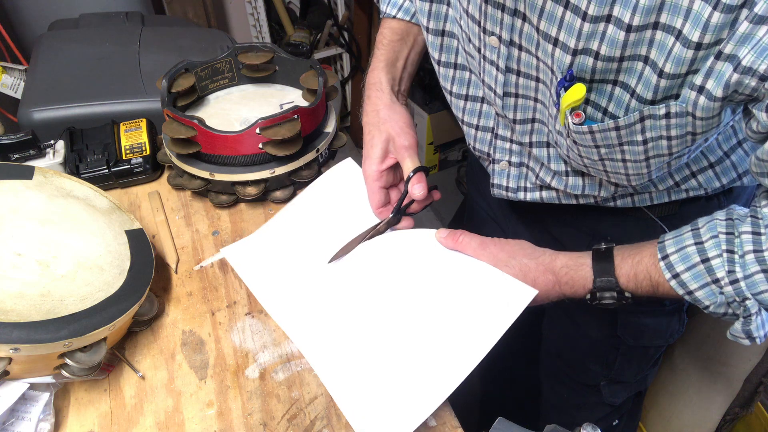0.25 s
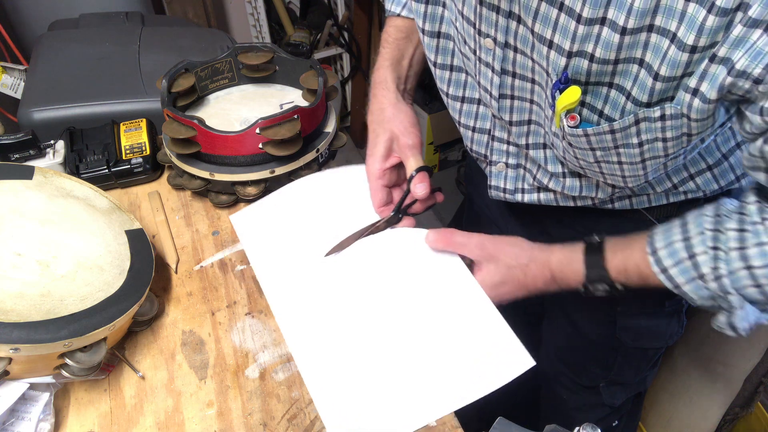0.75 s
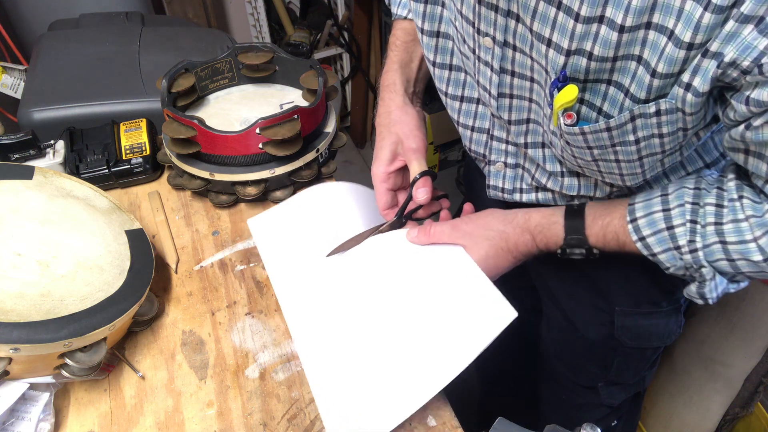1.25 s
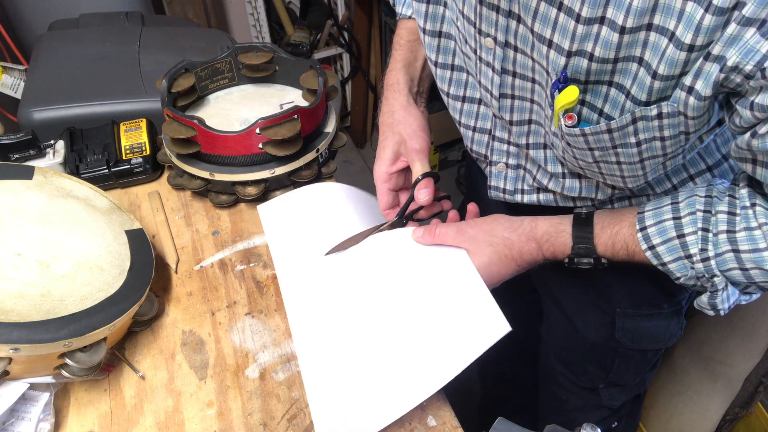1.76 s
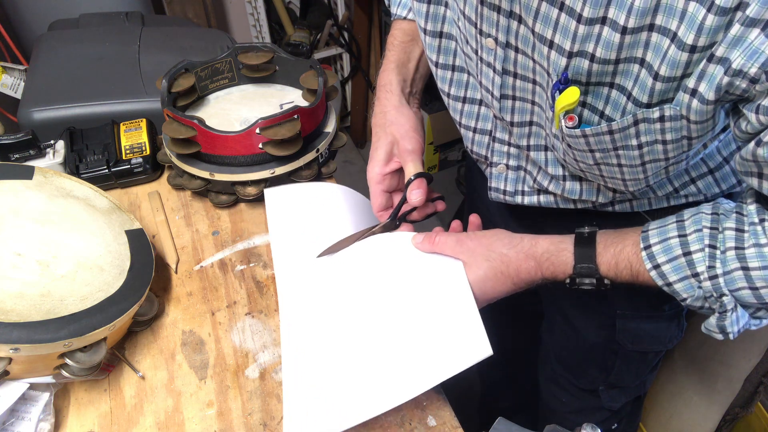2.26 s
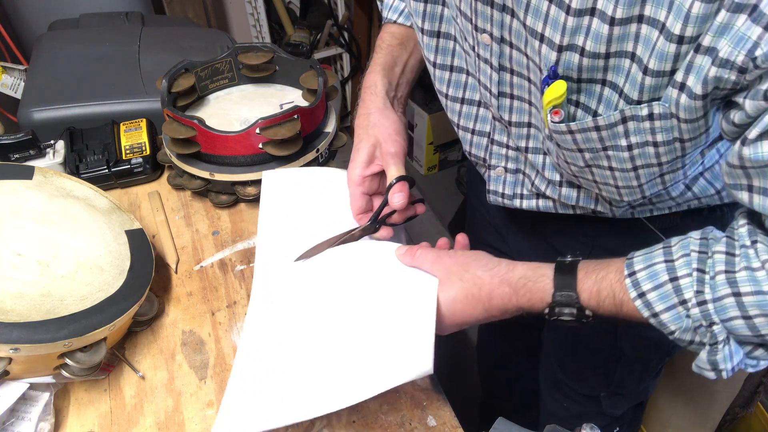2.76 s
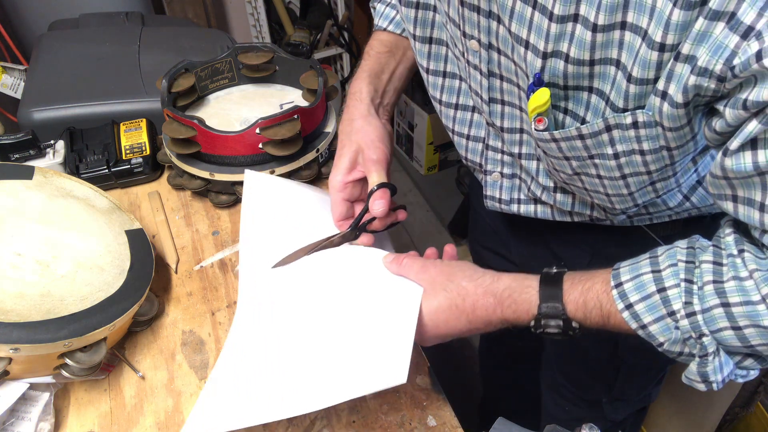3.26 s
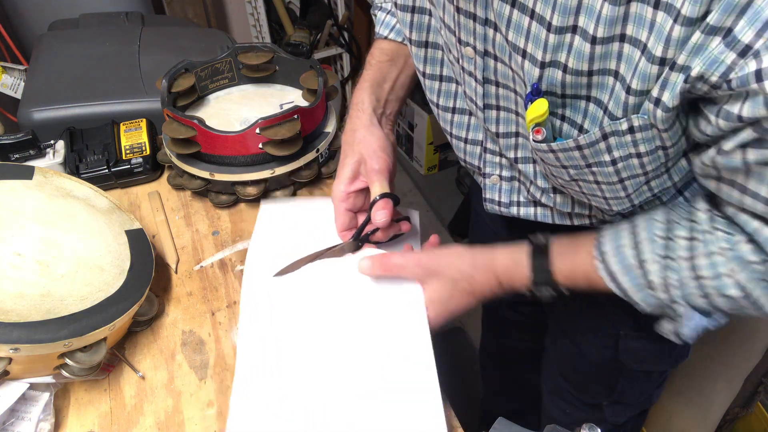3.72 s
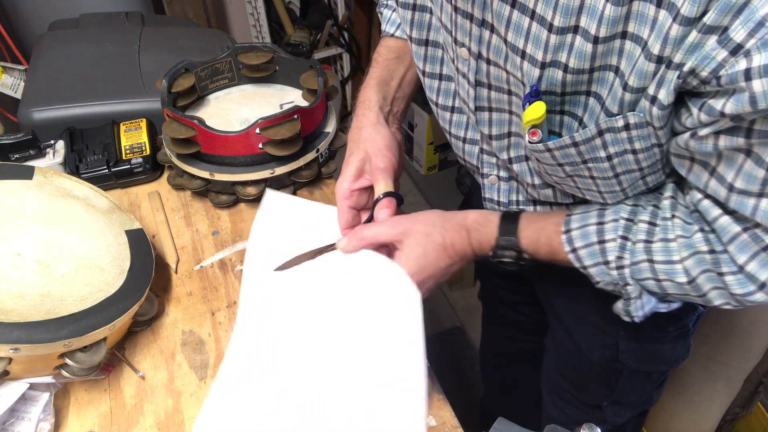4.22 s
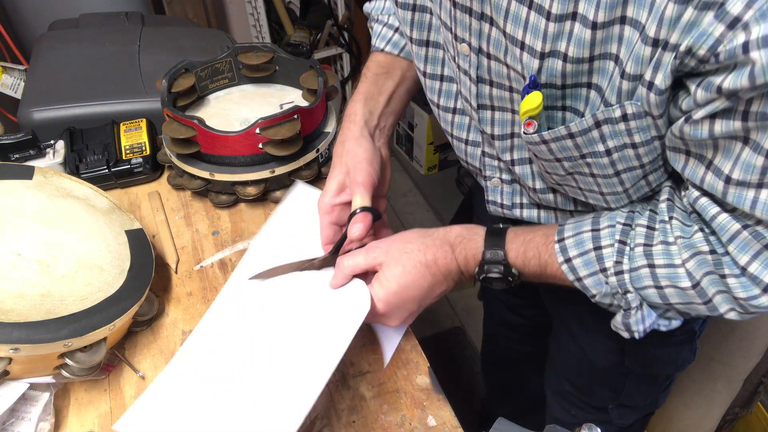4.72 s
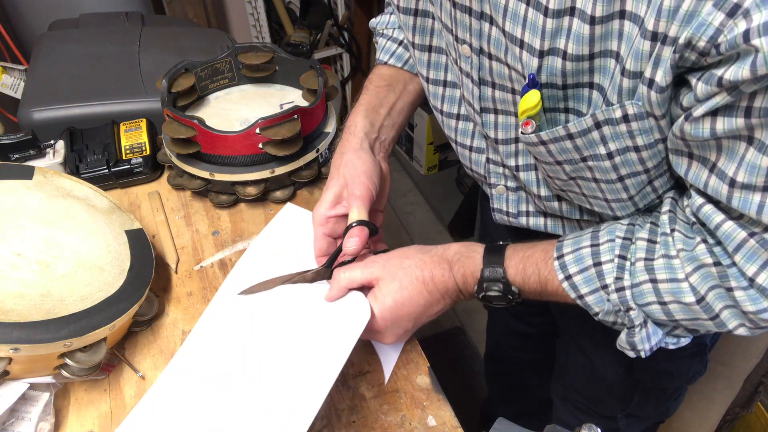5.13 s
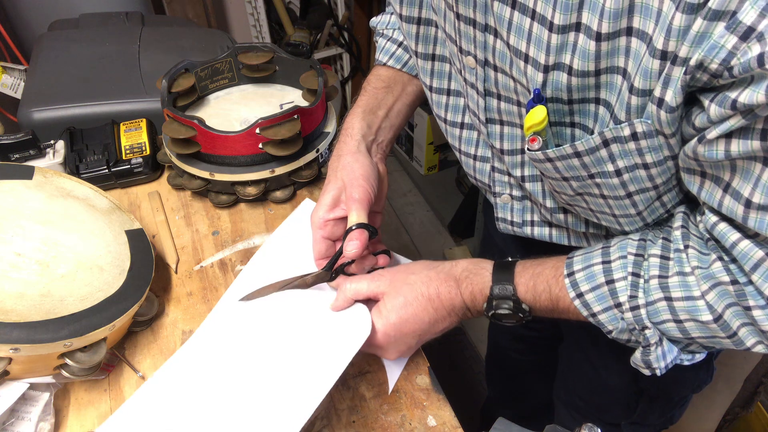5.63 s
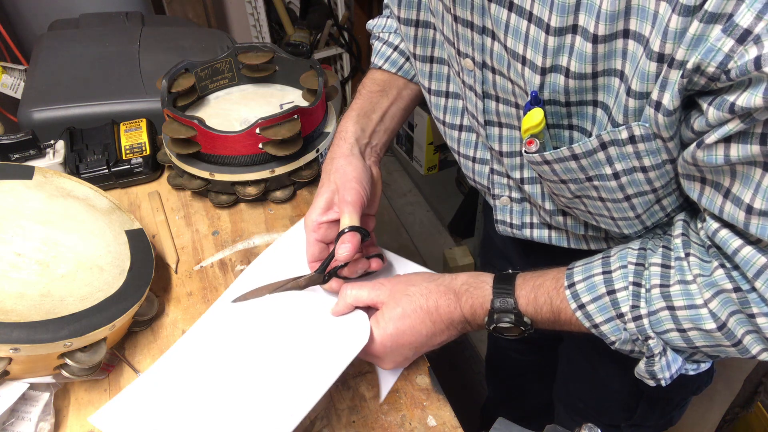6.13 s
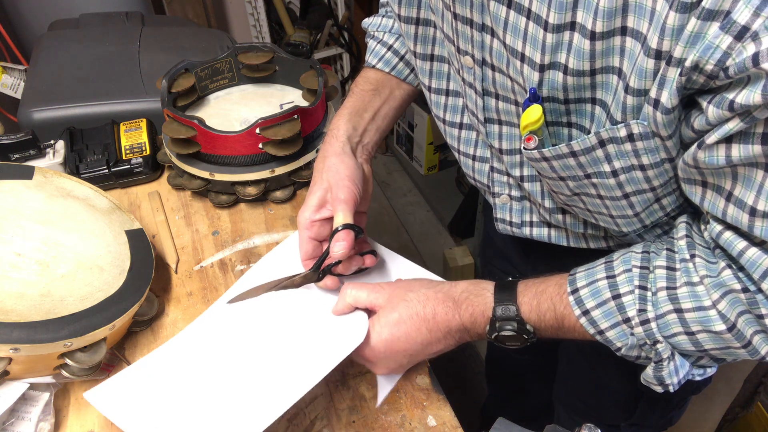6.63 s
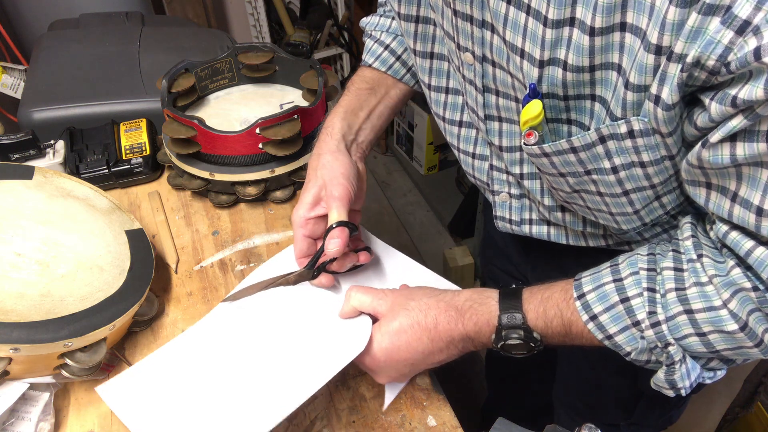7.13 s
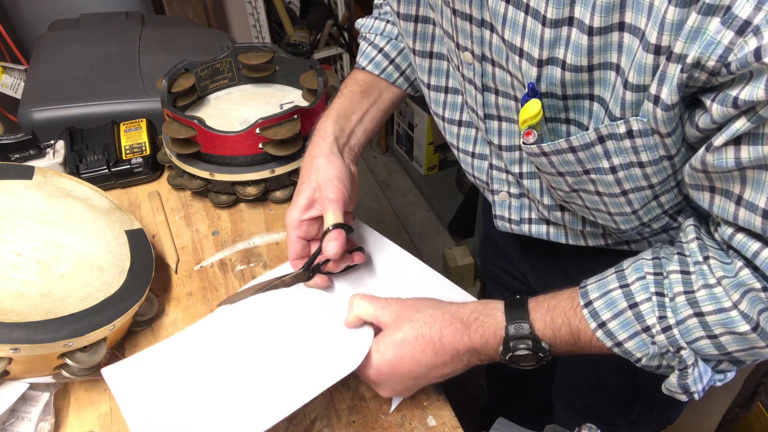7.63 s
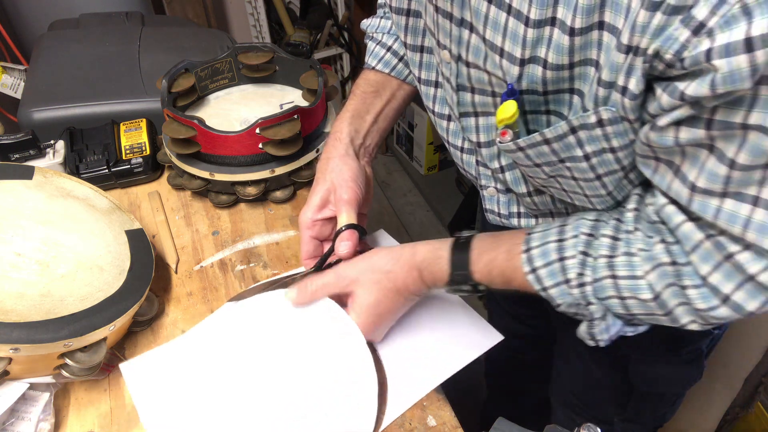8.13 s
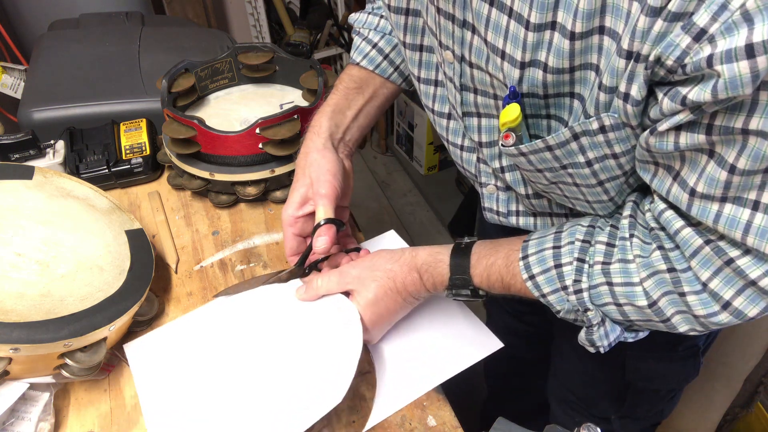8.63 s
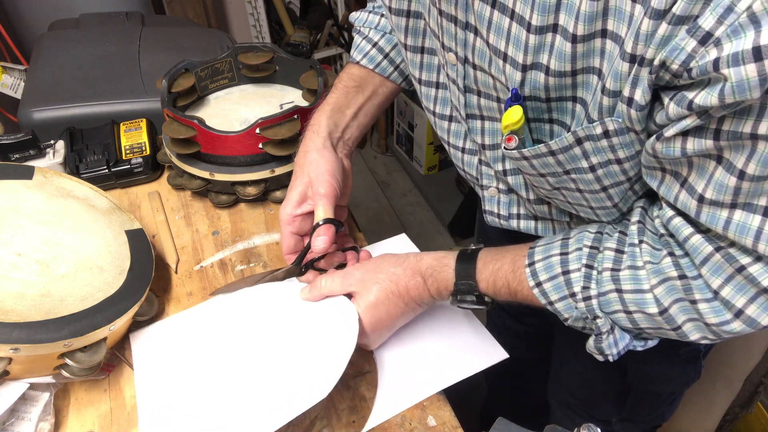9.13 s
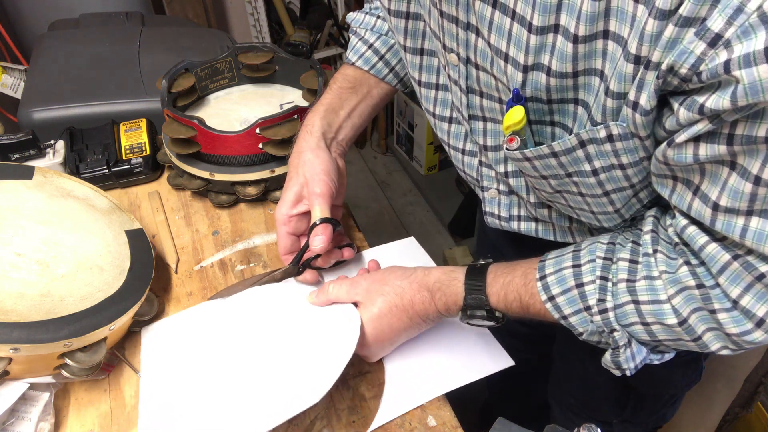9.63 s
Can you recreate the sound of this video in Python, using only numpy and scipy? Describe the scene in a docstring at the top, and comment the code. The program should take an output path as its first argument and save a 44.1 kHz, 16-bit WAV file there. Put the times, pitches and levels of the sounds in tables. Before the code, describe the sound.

Scissors snip through a sheet of paper in quick raspy strokes, pausing as the sheet slides and rustles, over low room noise.

```python
"""Over workshop room noise, scissors snip through a sheet of paper, up to about four strokes a second.
Each stroke shears fibres in a grainy rasp; single fibres snap, the blades stick and slip in short bursts.
The free sheet flutters low, now and then bumps the bench, and hisses as hand and steel slide over it.
Near 4 s a low hum comes in; after a pause of sliding, the blades cut on deep in the sheet.
Around 8 s the sheet slides again and the hum fades out, then five last snips follow."""
import sys
import numpy as np
from scipy import signal
from scipy.fft import rfft, irfft, next_fast_len
from scipy.io import wavfile
from scipy.ndimage import uniform_filter1d, map_coordinates

SR = 44100
rng = np.random.default_rng(int(sys.argv[2]) if len(sys.argv) > 2 else 0)


def generate_wav(sig):
    """Save sig (samples, or channels by samples) to the path in sys.argv[1] as 16-bit PCM at SR."""
    pcm = np.round(np.clip(np.atleast_2d(sig).T, -1, 1) * 32767).astype(np.int16)
    wavfile.write(sys.argv[1], SR, pcm)


N = 435266

# Colours of the layers. Each row: frequency in Hz, relative level per Hz in dB.
ROOM_TONE = [(25, -10), (35, 14), (66, 19), (211, 7), (800, 3), (1620, -7.5), (4360, -19), (5740, -19),
             (10000, -23), (14600, -23), (15900, -40)]
LOOSE_RASP = [(290, -57.5), (620, -52), (742, -8), (957, 1), (1420, 8.5), (2050, 11.5), (2950, 8.5),
              (8000, -31), (12500, -70)]  # cutting at the loose edge
DEEP_RASP = [(240, -70), (400, -15), (636, -3.5), (950, -5), (1370, 5.5), (2170, -11), (4440, -15),
             (6150, -27), (8000, -33), (12500, -80)]  # cutting deep in the sheet
SHEET_RUSTLE = [(290, -69), (500, -25), (728, -7.5), (1300, 3), (2370, 2.5), (3000, 1), (10000, -32),
                (14000, -65)]
SHEET_HISS = [(2350, -52), (4000, 0), (5400, -4), (6240, -1), (8600, -7), (12000, -5.5), (15900, -9.5)]
SHEET_FLUTTER = [(59, -26), (100, -5.5), (378, 5.5), (642, -1.5), (1000, -10.5), (1300, -41), (2200, -120)]
# Resonances. Each row: centre in Hz, width in Hz, lift in dB.
BLADE_RESONANCES = [(1290, 1300, 1), (2700, 960, -2.5), (2850, 64, 5), (4450, 180, 4.5), (5440, 350, 5.5),
                    (6350, 900, -0.5), (7950, 430, 4)]
MICROPHONE_EQ = [(9560, 550, 2.5), (10470, 700, -6)]
# The sheet slides on hand, steel and bench.
# Each row: time in seconds, rustle level in dB, hiss in dB relative to the rustle.
SLIDING = [(0, -69, -12), (.8, -72, -1), (.91, -62.5, -5.5), (1.02, -59, -9), (1.08, -52, -15),
           (1.15, -56.5, -6), (1.165, -51, -9), (1.24, -48.5, -10.5), (1.28, -57.5, -10.5), (1.42, -73, -6),
           (2.05, -67.5, -6), (2.55, -63.5, -12), (3, -58.5, -37), (3.45, -65, -13), (3.75, -58, -9),
           (3.99, -48.5, -16), (4.05, -66.5, -17), (4.27, -63.5, -5.5), (4.29, -57, 6), (4.36, -48.5, -5.5),
           (4.41, -48, -9), (4.62, -56, -10), (5, -67.5, -9.5), (7.8, -73.5, -1.5), (7.92, -50, -15),
           (8, -57, -5), (8.02, -62, -4), (8.225, -57, -6.5), (8.245, -54, 4), (8.295, -52.5, 1.5),
           (8.31, -55, -7.5), (8.42, -49.5, -5), (8.52, -55, -9.5), (8.68, -57, -5), (8.72, -77, 0.5),
           (9.87, -72.5, -8)]
# How far the blades are buried. Each row: time in seconds, depth from 0 (loose edge) to 1.
BLADE_DEPTH = [(0, 0.08), (2, 0.01), (3, 0.56), (3.5, 0.77), (4, 0.09), (4.8, 1), (7.8, 1), (8.2, 0.97),
               (8.7, 0.96), (9.87, 0.72)]
# The room's decay. Each row: frequency in Hz, seconds to fall by 60 dB.
ROOM_DECAY = [(300, 0.4), (2000, 0.094), (10000, 0.15)]
# Blade strokes. Each row: start in seconds, length in seconds, rasp level in dB, rise from middle to end
# in dB, hiss and flutter in dB relative to the rasp, resonance in Hz, its lift in dB, jerkiness 0 to 1.
BLADE_STROKES = [(0.008, 0.09, -46, -1.5, -14, -3.5, 6400, 5, 0.5),
                 (0.168, 0.051, -58, -1, -35, 4, 8960, -9, 0.1),
                 (0.221, 0.14, -50, -6, -9, -11, 2840, 4.5, 0.5),
                 (0.44, 0.059, -43, 1, -9.5, -9.5, 8500, 1, 0.5),
                 (0.56, 0.19, -52.5, -6.5, -12.5, -10.5, 8910, 1, 0.8),
                 (1.421, 0.17, -60, -8, -7.5, -3.5, 2400, 11, 0.4),
                 (1.68, 0.078, -49.5, 2.5, -10.5, -8, 3030, 10.5, 0),
                 (1.853, 0.18, -56, 1.5, -17, -11, 9000, 4, 1),
                 (2.146, 0.074, -44.0, -2.5, -14.5, -17.5, 6000, 9.5, 0),
                 (2.283, 0.15, -54, 3, -18.5, -23, 2700, 0, 1),
                 (2.573, 0.086, -43.5, -5.5, -17, -27, 6440, 8, 0),
                 (2.738, 0.16, -53, -3, -20, -17, 6500, 6, 0.95),
                 (2.952, 0.079, -46, -1, -16.5, -22, 6230, 7, 0),
                 (3.104, 0.24, -51.5, 4, -24, -16, 7000, 4, 0.8),
                 (3.475, 0.073, -49, -5.5, -21, -13, 5860, 9, 0),
                 (3.568, 0.098, -48, -1, -27, -21, 3830, 1, 0.6),
                 (3.785, 0.057, -51, -24, -16, -9, 3600, 9, 0.5),
                 (3.897, 0.087, -40, 5, -17.5, -44, 3050, 5.5, 0.25),
                 (4.699, 0.11, -51, 5.5, -9.5, -12, 5300, -0.5, 0.23),
                 (4.883, 0.11, -59, -1, -9, -27, 1050, 9, 0.94),
                 (5.069, 0.16, -55.5, -1, -17, -35, 4160, 7.5, 0.99),
                 (5.416, 0.076, -43, -5, -11, -20, 2480, 6.5, 0.35),
                 (5.62, 0.12, -50, 0.5, -16, -21, 1290, 5.5, 0.95),
                 (5.922, 0.096, -41.5, -2, -11.5, -23.5, 7840, 5.5, 0.06),
                 (6.168, 0.13, -49.5, -8, -10.5, -22, 1290, 0, 0.89),
                 (6.439, 0.095, -48.5, 0.5, -5, -14, 4590, 8.5, 0.07),
                 (6.664, 0.091, -45.5, -3, -10, -23, 1086, -3, 0.76),
                 (6.909, 0.11, -46, 3.5, -9, -23, 1084, 2, 0.73),
                 (7.096, 0.15, -44.5, 4, -15.5, -25, 8300, 8, 0.92),
                 (7.398, 0.097, -43.5, 6, -11, -24, 8140, 7, 0.5),
                 (7.553, 0.15, -40, 0, -12, -22, 4180, 1, 0.91),
                 (8.751, 0.15, -51, -5, -7.5, -29, 8200, 5.5, 0.4),
                 (9.044, 0.081, -45.5, -0.5, -10.5, -35, 7900, 6.5, 0),
                 (9.223, 0.097, -50.5, -1.5, -9, -18, 5570, 1, 0.95),
                 (9.452, 0.091, -46.5, 0, -11.5, -26.5, 7360, 6.5, 0),
                 (9.666, 0.1, -40, -8.5, -12.5, -28, 5600, 5, 0.66)]
# Cracks in the paper. Each row: time in seconds, strength in dB, treble in dB relative to that strength.
FIBRE_SNAPS = [(0.0179, -36, -28), (0.247, -23.5, -9), (0.6544, -31.5, 3), (0.6754, -32.5, 2),
               (0.951, -42, -12), (0.9837, -36, -17), (1.09, -40, -21), (1.097, -34, -22),
               (1.947, -23.5, -5), (2.946, -39, -6), (3.1556, -33, -10), (3.592, -26.5, -16),
               (3.619, -40, 6), (4.528, -19, -34), (5.919, -36.5, -12), (6.786, -35, -20),
               (6.819, -36, -18), (7.4129, -22.5, -34), (7.8589, -27, -30), (7.903, -33, -23),
               (8.707, -44, -8), (9.398, -41, -13)]
BLADE_SLIPS = [(0.309, -36, -14), (0.337, -38, -10), (1.065, -33.5, -34), (1.433, -37, -7),
               (1.446, -32, -6), (1.475, -43, -15), (1.499, -42, -15), (1.524, -43, -18), (1.54, -42, -18),
               (1.562, -36.5, -29), (1.868, -32.5, -12), (1.903, -40, -20), (1.921, -34, -14),
               (1.932, -37, -18), (2.39, -29, -13), (2.587, -33, -25), (2.747, -35.5, -15),
               (2.777, -30.5, -5), (2.79, -33, -7), (2.806, -42, -10), (2.855, -20, -9.5),
               (2.991, -25.5, -16), (3.112, -23, -18), (3.172, -24, -13), (3.186, -36, -16),
               (3.205, -23, -10), (3.227, -30, -18), (3.248, -27, -19), (3.269, -17.5, -11),
               (3.3, -22.5, -12), (3.32, -23, -13), (3.484, -29.5, -13), (3.592, -34, -25),
               (3.655, -29.5, -5), (3.785, -28, -12), (3.798, -15.5, -25), (3.831, -22, -24),
               (3.952, -12, -21), (3.961, -16, -32), (4.394, -26, -24), (4.538, -32, -29),
               (4.682, -33.5, -13), (4.734, -29, -28), (4.906, -30, -12), (5.075, -36.5, -8),
               (5.13, -31, -10), (5.216, -23, -12.5), (5.283, -23.5, -13), (5.629, -25.5, -13),
               (5.644, -35, -12), (5.684, -21.5, -7.5), (5.727, -21.5, -14), (5.764, -29.5, -18),
               (6.182, -31, -14.5), (6.223, -23.5, -12), (6.258, -21, -12), (6.693, -33, -1),
               (6.736, -25.5, -12), (6.929, -33, -18), (7.021, -27, -15), (7.138, -25.5, -10),
               (7.149, -21.5, -7), (7.17, -21, -12), (7.213, -17, -25), (7.235, -26, -18), (7.26, -23, -18),
               (7.49, -38, -12.5), (7.574, -28, -24), (7.589, -17.5, -15), (7.6, -22, -15),
               (7.624, -24, -25), (7.666, -17.5, -16), (7.696, -17.5, -16), (7.748, -30, -9),
               (7.769, -26, -18), (7.778, -10, -14), (8.765, -38, -14), (8.819, -29, -8), (8.843, -32, -7),
               (8.867, -32, -21), (8.88, -32, -25), (8.9, -31, -32), (8.942, -28, -10), (8.964, -25.5, -13),
               (9.117, -27.5, -8), (9.226, -24.5, -4), (9.257, -33, -7), (9.282, -34, -14),
               (9.318, -28, -11), (9.327, -26.5, -10.5), (9.617, -39.5, -35), (9.678, -20.5, -4.5),
               (9.711, -35, -10), (9.732, -23, -23), (9.761, -23, -11)]
# Low thuds as the sheet flaps or knocks the bench. Each row: start in seconds, level in dB, pitch in Hz.
THUDS = [(0.186, -31, 283), (1.236, -32, 500), (3.74, -35.5, 210), (3.791, -31.5, 90),
         (3.962, -35, 165), (4.15, -33, 193)]
# The hum's drift. Each row: time in seconds, pitch in Hz, level in dB.
HUM_PATH = [(3.7, 60.3, -92), (3.78, 64.4, -66), (4.55, 63.2, -54), (4.78, 51, -72), (5.22, 61, -60.5),
            (5.56, 63.4, -62), (5.62, 66, -63), (5.71, 81.5, -64.5), (8.34, 83, -66), (8.499, 75, -91)]

ROOM_TONE_DB, REVERB_DB, TOP_HZ = -66, -11.5, 15850
ATTACK_S, RELEASE_DB_PER_S = 0.02, 724
CLUMP_SMOOTH_DB, CLUMP_JERKY_DB = 1.5, 3  # level spread as fibres tear in clumps
CRINKLE_DB, CRINKLE_KNOTS_PER_S = 6, 490  # the sliding sheet crinkles in short peaks
SLIDE_FLUTTER_DB, HELD_FLUTTER_DB = -6, -12  # relative to the rustle; further drop with buried blades
SMOOTH_GRIP = 0.42  # smooth strokes hold the sheet less tightly, so take less of the deep colour
STICK_S, STICK_DB = 0.017, -11  # a jerky stroke falls quiet while the blades stick
SLIP_S, SLIP_LEAD_S = 0.0065, 0.0032  # catch to peak; the force builds just before the edge jumps
CRACK_LOW_HZ = 770  # slips and snaps are too small and quick to move the sheet much below this


def amp(db):
    return 10 ** (np.asarray(db) / 20)


def unit(x):
    return x / np.sqrt(np.mean(x ** 2) + 1e-20)


def even(x):
    """x with its level held steady over the length of a slip."""
    return x / np.sqrt(np.abs(uniform_filter1d(x ** 2, size=round(SLIP_S * SR))) + 1e-20)


def along(points, hz):
    """Read (Hz, value) points on a log frequency axis."""
    knots_hz, values = np.transpose(points)
    return np.interp(np.log(hz + 1), np.log(knots_hz + 1), values)


def curves(rows):
    """One value per sample for each column after the time."""
    times, *columns = np.transpose(rows)
    return [np.interp(np.arange(N) / SR, times, column) for column in columns]


def wobble(rate):
    """A smooth random curve, rate knots a second."""
    return map_coordinates(rng.standard_normal(int(N * rate / SR) + 4), [np.arange(N) * rate / SR])


def lifted(resonances, hz):
    """Gain in dB of a set of bell-shaped resonances."""
    return sum(db / (1 + (2 * (hz - centre) / width) ** 2) for centre, width, db in resonances)


def filtered(x, response):
    """x through a gain given as a function of frequency."""
    size = next_fast_len(N + SR // 2)
    return irfft(rfft(x, size) * response(np.fft.rfftfreq(size, 1 / SR)), size)[..., :N]


def coloured(x, spectrum, resonances=()):
    """x through a spectrum and its resonances, at rms 1."""
    return unit(filtered(x, lambda hz: amp(along(spectrum, hz) + lifted(resonances, hz))))


def room_tone():
    """A bed of rumbling room noise whose level wavers slightly."""
    return amp(ROOM_TONE_DB + 0.38 * wobble(2.7)) * coloured(rng.standard_normal(N), ROOM_TONE)


def fibres(grain_db=2.0):
    """Grainy noise of tearing fibres, with single sharper breaks."""
    return amp(grain_db * wobble(900)) * rng.standard_normal(N)


def paper():
    """The sheet slides and is cut: one tearing noise drives rasp, cracks, rustle, hiss and flutter."""
    slide_db, slide_hiss_db = curves(SLIDING)
    depth = np.clip(curves(BLADE_DEPTH)[0], 0, 1)
    stroke_rasp, stroke_hiss, stroke_flutter, jerky = strokes()
    slip, slip_treble, stuck = slips()
    snap, snap_treble = snaps()
    tear = fibres()

    clump_db = CLUMP_SMOOTH_DB + (CLUMP_JERKY_DB - CLUMP_SMOOTH_DB) * jerky
    clumps = amp(clump_db * wobble(90) + STICK_DB * jerky * stuck)
    crinkle_peaks = np.clip(wobble(CRINKLE_KNOTS_PER_S) - 1.2, 0, 1.4)
    crinkles = amp(CRINKLE_DB * crinkle_peaks + 2.95 * wobble(30))
    slide_flutter = amp(slide_db + SLIDE_FLUTTER_DB + HELD_FLUTTER_DB * depth)

    # Buried blades bring in their own resonances and darken the rasp.
    grip = depth * np.clip(SMOOTH_GRIP + (1 - SMOOTH_GRIP) * jerky, 0, 1)
    rasp_noise = np.sqrt(1 - grip) * coloured(tear, LOOSE_RASP)
    rasp_noise += np.sqrt(grip) * coloured(tear, DEEP_RASP, BLADE_RESONANCES)
    hiss_noise = np.sqrt(1 - depth) * coloured(tear, SHEET_HISS)
    hiss_noise += np.sqrt(depth) * coloured(tear, SHEET_HISS, BLADE_RESONANCES)

    rasp = clumps * stroke_rasp * unit(rasp_noise)
    cracks = amp(3) * (slip + snap) * even(rasp_noise)
    cracks = filtered(cracks, lambda hz: (1j * hz / (CRACK_LOW_HZ + 1j * hz)) ** 2)  # low cut
    cracks += (slip_treble + snap_treble) * even(hiss_noise)
    rustle = crinkles * amp(slide_db) * coloured(tear, SHEET_RUSTLE)
    hiss = (clumps * stroke_hiss + crinkles * amp(slide_db + slide_hiss_db)) * hiss_noise
    flutter = clumps * (stroke_flutter + slide_flutter) * coloured(tear, SHEET_FLUTTER)
    return bending(rasp + cracks + rustle + hiss + flutter)


def bending(x, patchy_db=2.5, relative_width=0.085):
    """The bending sheet keeps shifting its resonances, and each stroke adds a peak or dip of its own."""
    hz, t, spectrum = signal.stft(x, SR, nperseg=512)
    patches = uniform_filter1d(rng.standard_normal(spectrum.shape), size=5, axis=0)  # across frequency
    patches = uniform_filter1d(patches, size=14, axis=1)  # across time
    gain_db = patchy_db * unit(patches)
    for start, length, *_, centre_hz, lift_db, _ in BLADE_STROKES:
        bell_db = lifted([(centre_hz, relative_width * centre_hz, lift_db)], hz)
        gain_db += np.outer(bell_db, (t >= start) & (t < start + length + ATTACK_S))
    return signal.istft(spectrum * amp(gain_db), SR, nperseg=512)[1][:N]


def reverb(x, predelay_samples=200):
    """A short room tail, longest in the bass, drawn afresh every quarter second so it keeps changing."""
    out, step = np.zeros(N + SR), SR // 4
    for start in range(0, N, step):
        hz, t, noise = signal.stft(rng.standard_normal(SR // 2), SR, nperseg=256)
        decay = amp(-60 * t / along(ROOM_DECAY, hz)[:, None])
        tail = signal.istft(noise * decay, SR, nperseg=256)[1]
        wet = signal.fftconvolve(x[start:start + step], tail / np.linalg.norm(tail))
        out[start + predelay_samples:][:len(wet)] += wet
    return out[:N]


def strokes():
    """Each stroke bites fast, drifts, then dies away: envelopes of rasp, hiss, flutter and jerkiness."""
    layers, jerky, t = np.zeros((3, N)), np.zeros(N), np.arange(N) / SR
    for start, length, db, rise_db, hiss_db, flutter_db, _, _, jerkiness in BLADE_STROKES:
        span = slice(round(start * SR), round((start + length + 0.05) * SR))
        age = t[span] - start
        attack = np.clip(age / ATTACK_S, 0, 1) ** 2
        drift_db = rise_db * (2 * np.minimum(age / length, 1) - 1)
        release_db = RELEASE_DB_PER_S * np.maximum(age - length, 0)
        envelope = attack * amp(db + drift_db - release_db)
        layers[:, span] += amp([[0], [hiss_db], [flutter_db]]) * envelope
        jerky[span] = np.clip(jerkiness, 0, 1)
    return *layers, jerky


def snaps(t60_s=0.018, trim_db=-13.5):
    """Single fibres break with a dry tick: envelopes of body and treble."""
    out, t = np.zeros((2, N + SR)), np.arange(SR // 20) / SR
    for start, db, treble_db in FIBRE_SNAPS:
        envelope = amp(db + trim_db - 60 * t / t60_s)
        out[:, round(start * SR):][:, :len(t)] += envelope * amp([[0], [treble_db]])
    return out[:, :N]


def thuds(attack_s=0.004, t60_s=0.027):
    """The sheet flaps or knocks the bench: a soft low thud without ring."""
    out, t = np.zeros(N + SR), np.arange(SR // 5) / SR
    for start, db, hz in THUDS:
        envelope = amp(db - 60 * t / t60_s) * (1 - np.exp(-t / attack_s))
        out[round(start * SR):][:len(t)] += envelope * np.sin(2 * np.pi * hz * t)
    return out[:N]


def slips(half_width=0.73, squareness=1.6, trim_db=-15.5):
    """The blades catch, run free and grip again: envelopes of body, treble and the sticking before."""
    body, treble, stuck = np.zeros((3, N + SR))
    progress = np.arange(SR // 10) / SR / SLIP_S  # 1 at the peak
    burst = np.exp(-np.abs((progress - 1) / half_width) ** squareness)
    stick = np.hanning(round(STICK_S * SR))
    for time, db, treble_db in BLADE_SLIPS:
        start = round((time - SLIP_LEAD_S) * SR)
        envelope = amp(db + trim_db) * burst
        body[start:][:len(burst)] += envelope
        treble[start:][:len(burst)] += amp(treble_db) * envelope
        stuck[start - len(stick) * 3 // 4:][:len(stick)] += stick
    return body[:N], treble[:N], stuck[:N]


def hum():
    """A low, wandering tone from beyond the bench swells and fades."""
    hz, db = curves([(0, 62, -90), *HUM_PATH, (8.7, 64, -90)])
    level = amp(db + 0.69 * wobble(13))
    return np.sqrt(2) * level * np.sin(2 * np.pi * np.cumsum(hz) / SR)


def scene():
    """Paper and bench up close with a little reverb, over hum and room tone, in mono."""
    near = paper() + thuds()
    return (near + amp(REVERB_DB) * reverb(near) + hum() + room_tone())[None]


def record(dry):
    """The microphone adds a bump and a dip in the treble and cuts off the very top."""
    return filtered(dry, lambda hz: amp(lifted(MICROPHONE_EQ, hz)) * (hz < TOP_HZ))


dry = scene()
out = record(dry)
generate_wav(out)
```